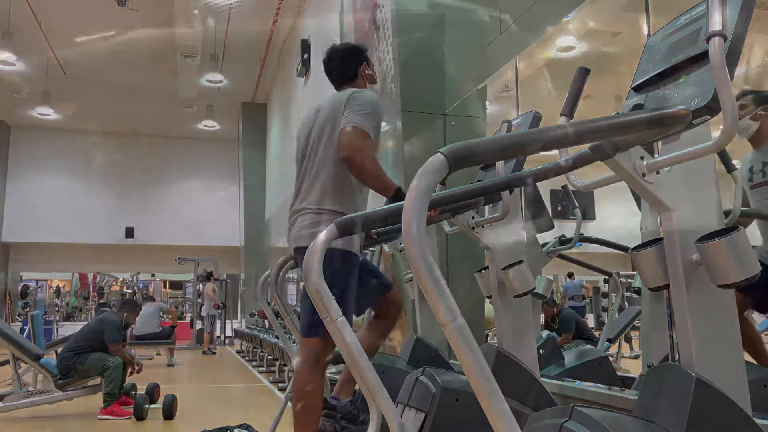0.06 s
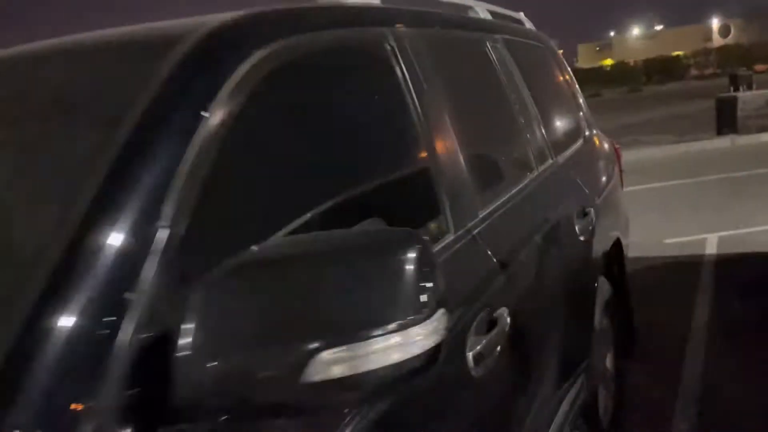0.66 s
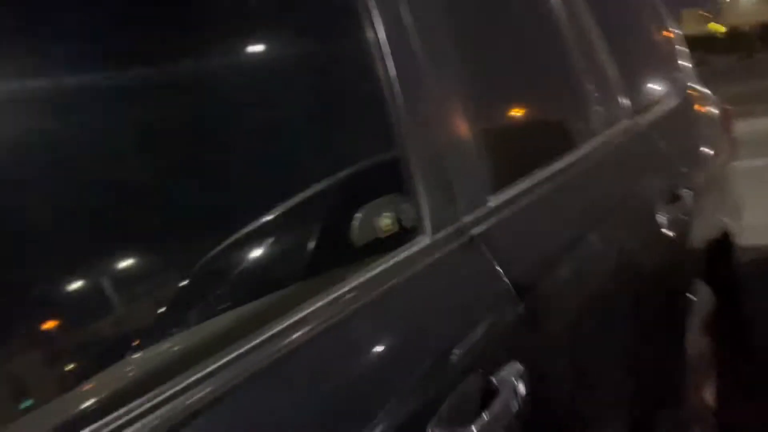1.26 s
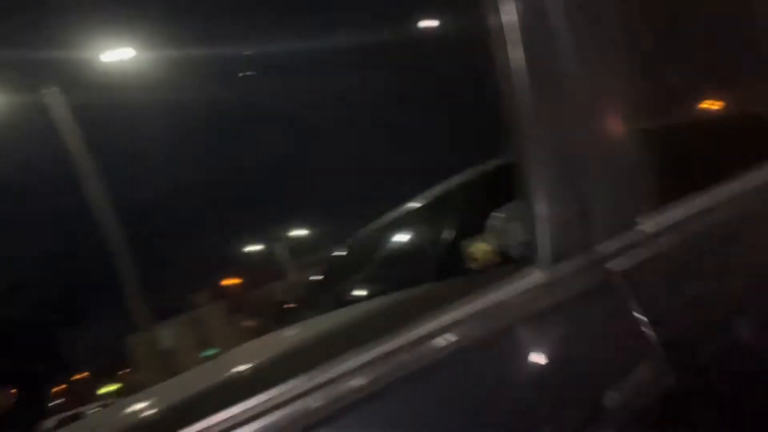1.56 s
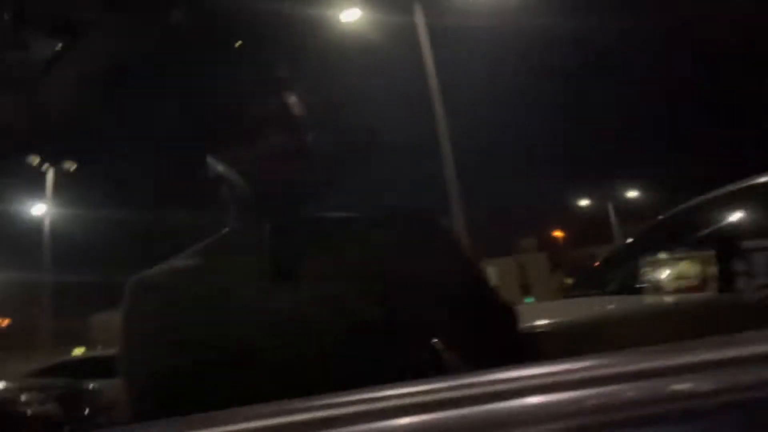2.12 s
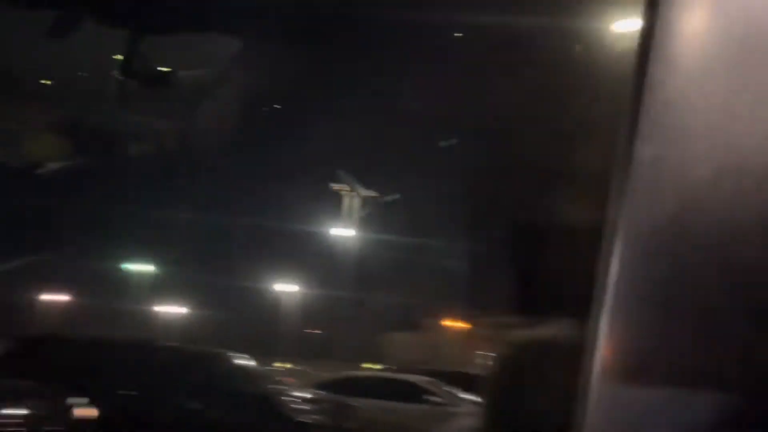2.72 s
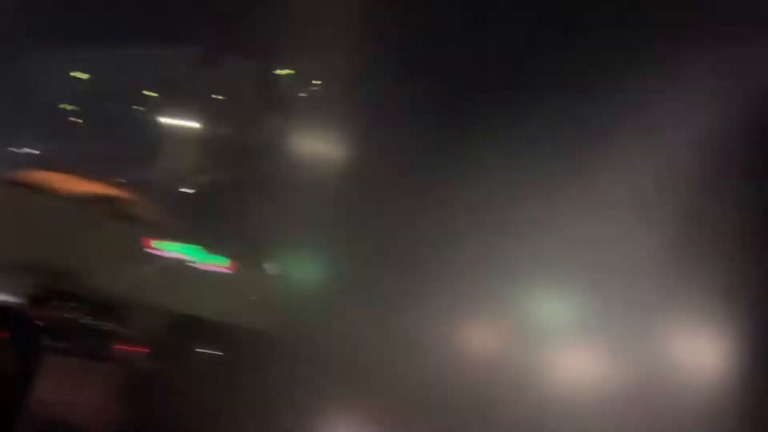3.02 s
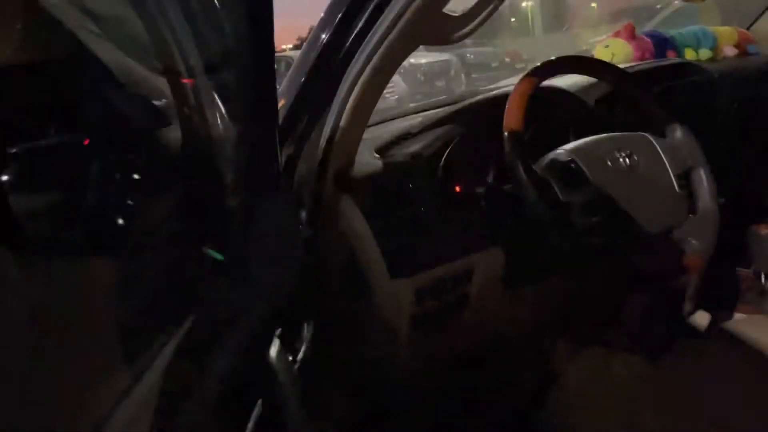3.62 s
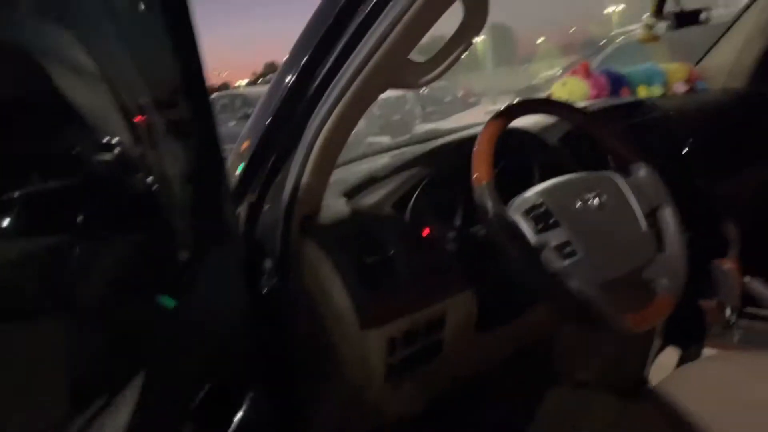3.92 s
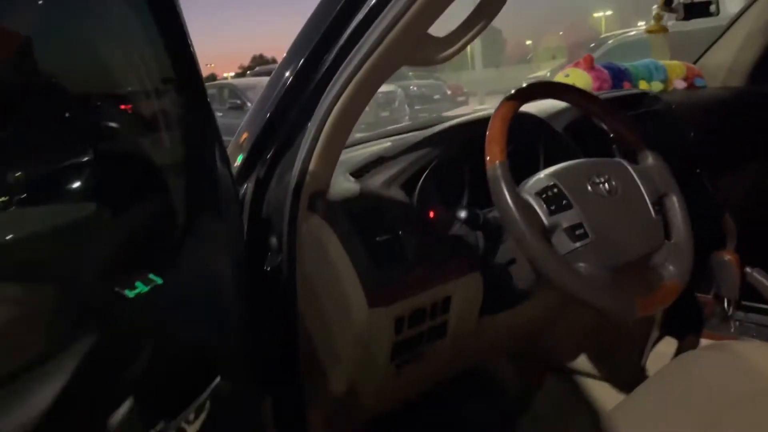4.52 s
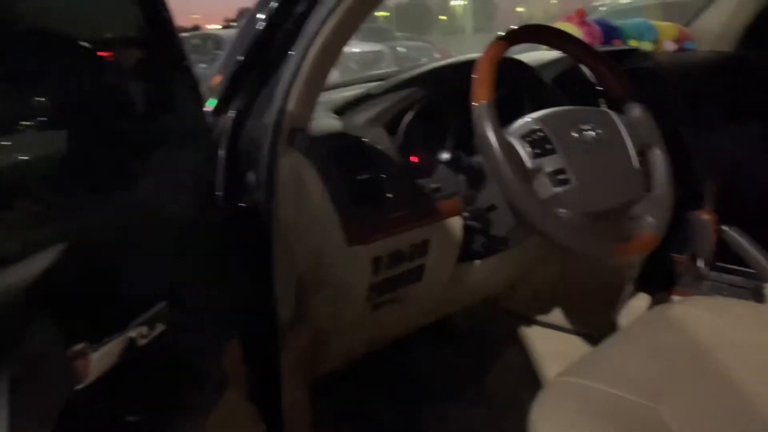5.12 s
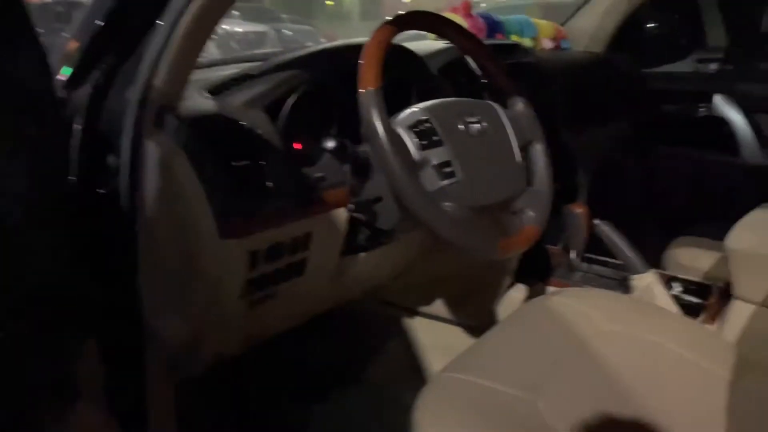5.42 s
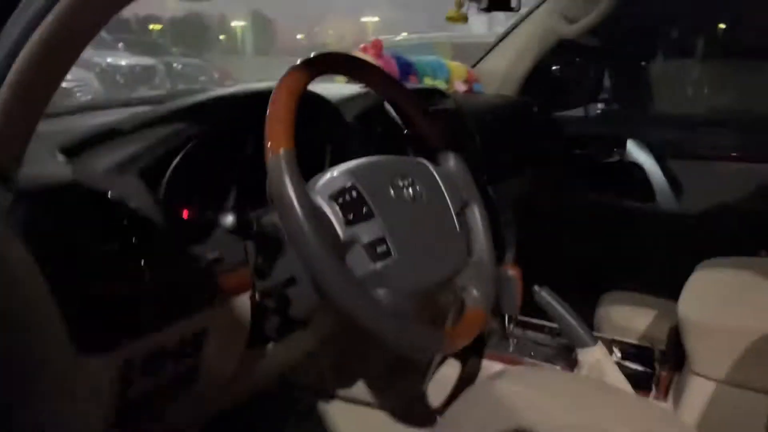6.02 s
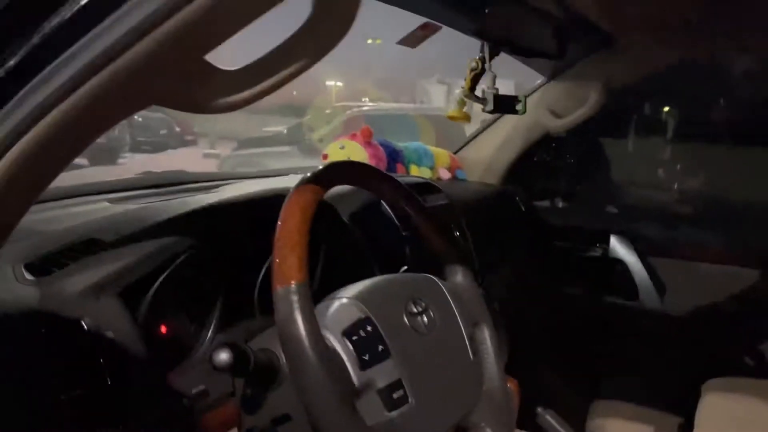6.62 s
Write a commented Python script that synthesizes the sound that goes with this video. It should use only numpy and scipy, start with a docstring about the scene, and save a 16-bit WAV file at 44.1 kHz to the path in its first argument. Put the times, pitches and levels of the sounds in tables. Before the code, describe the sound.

A gym's drone of exercise machines, with a faint pulsing squeal, fades out by 0.7 seconds. A low engine rumble and distant traffic in an outdoor car park continue throughout. From 0.8 seconds light steps tick on grit, and a hiss gradually swells while a hand rubs faintly by the microphone. At 2.5 seconds a car door handle scrapes out with a dull thud, very close. At about 3.1 seconds comes the loudest sound: the steel latch snaps and the seal pops with a deep thump, cutting off the swelling hiss. The handle immediately knocks back, and the door bumps softly at 3.3. Clothes rustle faintly from 3.5 to 3.8, and a small motor gives a tiny whirr at 4.2. At 6.2 seconds a short scuff on the sill ends in a click. The cabin softens the traffic, with a last faint rustle near 6.8.

```python
"""The drone of a hall with running exercise machines fades into a night car park: engine rumble, far traffic.
Steps tick on grit and a hiss swells as someone walks up to a car; a hand rubs by the microphone.
The door handle scrapes out with a thud, the steel latch snaps, the seal pops, the handle knocks back
and the door bumps its stay. Clothes rustle, a small motor whirrs and a scuff on the sill ends in a click,
while the cabin shelters the microphone more and more."""
import sys
import numpy as np
from scipy import signal
from scipy.fft import rfft, irfft, next_fast_len
from scipy.io import wavfile

SR = 44100
rng = np.random.default_rng(int(sys.argv[2]) if len(sys.argv) > 2 else 0)


def generate_wav(signal):
    """Clip the signal to [-1, 1] and save it as 16-bit WAV at the path in sys.argv[1]."""
    frames = np.transpose(np.atleast_2d(signal))
    scaled = np.clip(frames, -1, 1) * 32767
    pcm = np.round(scaled).astype(np.int16)
    wavfile.write(sys.argv[1], SR, pcm)


N = 302516
TIME = np.arange(N) / SR


def from_db(db):
    """Decibels to gain."""
    return 10 ** (np.asarray(db) / 20)


def unit_rms(x):
    """Scale to unit power."""
    return x / np.sqrt(np.mean(x ** 2) + 1e-20)


def automation(rows):
    """A curve of (seconds, value) points, read at every sample."""
    return np.interp(TIME, *np.transpose(rows))


def at_hz(points, hz):
    """Read a table along log frequency, held at its ends."""
    f, value = np.transpose(points)
    return np.interp(np.log(hz + 1), np.log(f), value)


def response(spectrum, hz, skirt_db=30):
    """Unit-power EQ curve that falls by skirt_db an octave for two octaves beyond its ends."""
    octaves_out = np.abs(np.log2((hz + 1) / np.clip(hz + 1, spectrum[0][0], spectrum[-1][0])))
    return unit_rms(from_db(at_hz(spectrum, hz) - skirt_db * np.minimum(octaves_out, 2)))


def colour(x, spectrum, tilt_db=0):
    """Minimum-phase EQ with this spectrum, tilted by tilt_db an octave."""
    size = 2 * next_fast_len(x.shape[-1] // 2 + 1)
    hz = np.fft.rfftfreq(size, 1 / SR)
    gain = unit_rms(response(spectrum, hz) * from_db(tilt_db * np.log2(hz + 100)))
    cepstrum = irfft(np.log(gain))[:size // 2]
    cepstrum[1:] *= 2
    return irfft(rfft(x, size) * np.exp(rfft(cepstrum, size)))[..., :x.shape[-1]]


def low_cut(x, edge_hz, order=2):
    """Roll off the bass, as a small body radiates little below its edge."""
    return signal.sosfilt(signal.butter(order, edge_hz, "high", fs=SR, output="sos"), x)


# Stereo image of diffuse noise. Each row: frequency in Hz, left-right correlation from -1 to 1.
CORRELATION = [(120, 0.97), (270, 0.66), (600, 0.062), (2000, 0), (6000, 0.38), (8500, 1)]
def diffuse_noise(spectrum):
    """Unit-power stereo noise, wide in the mids and narrow in the bass and the top."""
    size = 2 * next_fast_len(N // 2 + 1)
    hz = np.fft.rfftfreq(size, 1 / SR)
    alike = np.clip(at_hz(CORRELATION, hz), -.99, .99)
    mid, side = rfft(rng.standard_normal((2, size)))
    stereo = np.sqrt(1 + alike) * mid + np.sqrt(1 - alike) * side * [[1], [-1]]
    return unit_rms(irfft(stereo * response(spectrum, hz))[:, :N])


def drift(rate):
    """Random modulation of unit power, with rate new values a second."""
    knots = rng.standard_normal(16384)
    return unit_rms(np.interp(TIME * rate, np.arange(len(knots)), knots))


def tones(lines, wander_hz, flutter_db, flutter_rate):
    """Sines that waver in pitch and level."""
    out = np.zeros(N)
    for hz, db in lines:
        gain = from_db(db + flutter_db * drift(flutter_rate)) * np.sqrt(2)
        pitch = hz + wander_hz * drift(8)
        out += gain * np.sin(2 * np.pi * np.cumsum(pitch) / SR)
    return out


def swell(peak_s, rise_s, decay_s):
    """Envelope of a stroke: a rounded rise, then an exponential decay."""
    before, after = np.maximum(peak_s - TIME, 0), np.maximum(TIME - peak_s, 0)
    return np.exp(-(before / rise_s) ** 3 - after / decay_s)


def plateau(centre_s, half_s):
    """A flat-topped envelope with soft edges."""
    return np.exp(-((TIME - centre_s) / half_s) ** 4)


def struck(s, modes, lag_cycles=0, soft_hz=SR):
    """Modes ring from time s; low bending waves can lag, and a soft contact spares the high ones."""
    out, span = np.zeros(N), slice(int(s * SR), int(s * SR) + SR // 2)
    for hz, db, t60 in modes:
        age = np.maximum(TIME[span] - s - lag_cycles / hz, 0)
        envelope = from_db(db - 60 * age / t60) / np.hypot(1, hz / soft_hz)
        out[span] += envelope * np.sin(2 * np.pi * hz * age)
    return out


def burst(decay_s, spectrum, width, tilt_db=0, crack=0):
    """A contact: an optional crack, then a fast-dying cluster of tiny impacts."""
    fade = np.exp(-TIME[:SR // 8] / decay_s)
    mid, side = rng.standard_normal((2, len(fade)))
    impacts = (mid + width * side * [[1], [-1]]) * fade
    impacts[:, 0] += crack * np.linalg.norm(fade)
    return unit_rms(colour(impacts, spectrum, tilt_db)) * np.sqrt(np.mean(fade ** 2))


def friction(stroke, spectrum, grain_db, width):
    """Noise that catches and slips under the stroke."""
    mid, side = rng.standard_normal((2, N)) * stroke * from_db(grain_db * drift(640))
    return colour(mid + width * side * [[1], [-1]], spectrum)


def pan(x, left_db, left_lag_s):
    """Place a near source: the left side is louder by left_db and slightly delayed."""
    left = np.interp(TIME - left_lag_s, TIME, x)
    return np.array([left, x]) * from_db([[left_db / 2], [-left_db / 2]])


def add(out, s, sound):
    """Mix a short sound in at time s."""
    start = round(s * SR)
    out[:, start:start + sound.shape[1]] += sound


# The hall's drone and its machine hums. Each row: frequency in Hz, relative level in dB.
HALL_EQ = [(100, -24), (215, -1.5), (360, -11), (550, -6.5), (870, -8), (1180, -21.5), (2300, -27),
           (3200, -33), (8600, -47)]
MACHINE_HUMS = [(110, -2.5), (1650, -29)]
def hall(level_db=-28, fade_s=0.73, squeal_hz=2355, squeal_db=-49.5, turns_per_s=12.7):
    """Running machines drone and hum, one squealing with each turn; all fade to nothing."""
    fade = np.maximum(1 - TIME / fade_s, 0) ** 1.59
    hums = sum(tones(MACHINE_HUMS, wander_hz=14, flutter_db=4, flutter_rate=45) for _ in range(2))
    squeal = np.array([tones([(squeal_hz, squeal_db)], wander_hz=11, flutter_db=2.5, flutter_rate=110)
                       for side in range(2)])
    pulse_db = 4.5 * np.cos(2 * np.pi * turns_per_s * (TIME - 0.022))
    drone = from_db(level_db) * (diffuse_noise(HALL_EQ) + 0.33 * hums)
    return fade * (drone + np.sqrt(fade) * from_db(pulse_db) * squeal)


# The three outdoor beds and the engine's hum. Each row: frequency in Hz, relative level in dB.
RUMBLE_EQ = [(30, -3), (48, -1.5), (70, -1.5), (100, -0.5), (145, -6), (190, -10), (280, -16.5), (350, -21)]
TRAFFIC_EQ = [(260, -3.5), (370, -3), (500, 0.5), (900, -6), (1300, -10), (2200, -15.5), (2750, -21.5),
              (3200, -24), (4400, -27)]
HISS_EQ = [(2400, 4), (2780, 8), (3200, 3), (4200, -0.5), (5500, 1), (7000, -2.5), (8300, 3.5),
           (11500, 8.5), (12500, -44)]
ENGINE_HUM = [(64.5, -4.5), (97.5, -7), (148, -13), (278, -23.5)]
# The rumble's fader, highest beside the car. Each row: time in seconds, level in dB.
RUMBLE_FADER = [(0, -40), (1.1, -38.5), (2.5, -36), (3.3, -37.5), (4.8, -39.5), (6.86, -40.5)]
# The way into the cabin. Each row: time in seconds, amount of shelter from 0 to 1.
SHELTER = [(3.05, 0.44), (3.3, 0.41), (5.5, 0.59), (6.1, 0.8)]
# Brief dips. Each row: centre and half length in seconds, cuts to rumble, traffic and hiss in dB.
BED_DIPS = [(3.215, 0.041, 5.5, 5, 5), (4.568, 0.082, 8.5, 2, 0.5)]
def car_park(traffic_db=-47.5, hiss_db=-59.5, traffic_shelter_db=5, hiss_shelter_db=9.5):
    """An engine rumbles and hums under far traffic and fine hiss, both of which the cabin softens."""
    shelter = automation(SHELTER)
    dips = sum(np.outer(cuts, plateau(s, half)) for s, half, *cuts in BED_DIPS)
    rumble_dip, traffic_dip, hiss_dip = dips
    engine = diffuse_noise(RUMBLE_EQ) + tones(ENGINE_HUM, wander_hz=3.5, flutter_db=3, flutter_rate=14)
    rumble = from_db(automation(RUMBLE_FADER) - rumble_dip) * engine
    traffic_gain = from_db(traffic_db - traffic_shelter_db * shelter - traffic_dip + 1.24 * drift(25))
    traffic = traffic_gain * diffuse_noise(TRAFFIC_EQ)
    hiss_gain = from_db(hiss_db - hiss_shelter_db * shelter - hiss_dip + 0.75 * drift(7.9))
    return rumble + traffic + hiss_gain * diffuse_noise(HISS_EQ)


def rush(release_s=3.0548, hiss_db=-49.5, body_db=-41.5, rise_db_per_s=10.5, stop_s=0.0088):
    """A hiss grows on the way to the door, gains body late and stops as the latch lets go."""
    growth_db = rise_db_per_s * np.minimum(TIME - release_s, 0)
    gate = np.exp(-np.maximum(TIME - release_s, 0) / stop_s)
    hiss = from_db(hiss_db + growth_db + drift(23.2)) * diffuse_noise(HISS_EQ)
    body = from_db(body_db + 1.12 * growth_db) * diffuse_noise(TRAFFIC_EQ) * from_db([[1], [-2]])
    return gate * (hiss + body)


# The tone of a gritty contact. Each row: frequency in Hz, relative level in dB.
GRIT_EQ = [(300, 3), (1000, 8), (3000, -6.5), (5000, -15.5), (9000, -16), (12500, -24)]
# Steps on grit, ticks of trim and of the handle's linkage.
# Each row: start in seconds, level in dB, decay in seconds, resonance in Hz.
TICK_CUES = [(0.7963, -39, 0.0095, 2360), (0.866, -45, 0.011, 1150), (1.2672, -38, 0.012, 1040),
             (1.335, -42, .005, 1690), (1.9163, -36, .0036, 1050), (2.2522, -34, 0.0031, 1470),
             (2.4066, -41.5, 0.01, 1480), (2.4300, -31, 0.011, 935), (2.445, -32, 0.002, 8100),
             (2.56, -24.5, 0.004, 2180), (2.6299, -34.5, 0.011, 1940), (2.6840, -30, 0.0015, 1350),
             (3.1434, -20.5, 0.0012, 4900), (4.48, -45, 0.022, 1440), (6.6242, -40, 0.0049, 3270),
             (6.671, -47, .005, 2770)]
def ticks():
    """Light gritty contacts, each with one broad resonance and little body below it."""
    out = np.zeros((2, N))
    for s, db, decay, hz in TICK_CUES:
        grit = burst(decay, GRIT_EQ, width=0.6, crack=.5)
        resonance = burst(decay, [(hz / 1.4, -9), (hz, 0), (hz * 1.35, -8)], width=0.51)
        add(out, s, from_db(db) * low_cut(0.75 * grit + 0.58 * resonance, edge_hz=hz / 2))
    return out


# The fader of the rubbing hand. Each row: time in seconds, level in dB.
GRIP_FADER = [(1.5, -63.5), (2.7, -55.5), (3.04, -52), (3.2, -62.5), (3.55, -54.5), (4.1, -61),
              (4.7, -65.5)]
# The casing's resonances. Each row: frequency in Hz, relative level in dB.
CASING_EQ = [(400, 4.5), (740, -5), (920, 7.5), (1100, -15), (2500, -14), (2830, -4.5), (3150, -20),
             (7000, -21.5)]
def handling(slip_rate=90, slip_db=-4.5, slip_spread_db=10):
    """A hand rubs faintly on the hollow casing by the microphone; the skin slips in tiny crackles."""
    rub = from_db(2.5 * drift(11) + 1.8 * drift(130)) * diffuse_noise(CASING_EQ)
    slip_gain = from_db(slip_spread_db * np.minimum(drift(slip_rate), 2))
    slips = unit_rms(slip_gain * diffuse_noise(GRIT_EQ))
    return from_db(automation(GRIP_FADER)) * (rub + from_db(slip_db) * slips)


# The latch's crack and its steel modes. Each row: frequency in Hz, relative level in dB.
SNAP_EQ = [(200, -25), (550, 5), (850, -6), (1200, -7), (1600, 1), (2150, -2), (2700, -5.5), (3500, -9.5),
           (5500, -13.5), (8700, -12.5), (11700, -15), (12800, -26)]
STEEL_MODES = [(1530, -0.5), (1900, -3), (2420, -6), (2750, -3.5), (3133, -11), (3480, -13), (4215, -14),
               (6630, -13), (8930, -7.5)]
# Metal snaps of handle and lock, in a quick run as the latch lets go.
# Each row: start in seconds, level in dB, decay in seconds, brightness in dB per octave.
SNAP_CUES = [(2.2520, -32.5, 0.0019, 1.5), (2.5458, -33, 0.002, 2), (3.0553, -1, 0.00027, -3),
             (3.057, -5.5, 0.00083, 8), (3.0609, -0.5, 0.00018, 1), (3.0628, -5.5, 0.00038, -4.5),
             (3.068, -29, 0.0008, 2), (3.1299, -18.5, 0.0021, 4)]
def latch(ring_db=21, ring_loss_per_tilt=0.62, t60_s=.013):
    """Each snap cracks and sets the steel ringing in a fresh balance; the mids lean left."""
    out = np.zeros((2, N))
    for s, db, decay, tilt_db in SNAP_CUES:
        add(out, s, from_db(db) * burst(decay, SNAP_EQ, width=0.1, tilt_db=tilt_db, crack=1.3))
        modes = [(hz, level + rng.normal(0, 1.5), t60_s) for hz, level in STEEL_MODES]
        # the ring follows the snap's energy, less after a thin bright one
        ring_gain = from_db(db + ring_db - ring_loss_per_tilt * tilt_db) * np.sqrt(decay)
        out += ring_gain * struck(s, modes)
    mids = signal.sosfilt(signal.butter(1, [900, 5500], "band", fs=SR, output="sos"), out)
    return out + 0.41 * mids * [[1], [-1]]


# The scrape of the handle. Each row: frequency in Hz, relative level in dB.
PULL_EQ = [(200, -18), (720, 14.5), (1200, -1), (1900, 0), (3700, -9), (5500, -16), (8700, -10.5),
           (12500, -20)]
# Its strokes. Each row: peak time in seconds, level in dB, rise and decay in seconds.
PULL_CUES = [(2.517, -26.5, 0.0059, 0.018), (2.571, -36.5, 0.0091, 0.011)]
def handle_pull():
    """The handle slides out with friction in two short pulls."""
    stroke = sum(from_db(db) * swell(s, rise, decay) for s, db, rise, decay in PULL_CUES)
    return friction(stroke, PULL_EQ, grain_db=2.5, width=0.44)


# The door panel's modes. Each row: frequency in Hz, level in dB, time to fall 60 dB in seconds.
PANEL_MODES = [(66.2, 3.5, 0.062), (155, 2, 0.041), (237, 3.5, 0.034), (295, 2, 0.039), (464, -5, 0.074),
               (652, -9, 0.045), (844, -17, 0.028)]
# Blows on it. Each row: start in seconds, level in dB, cut-off in Hz (lower is softer).
THUD_CUES = [(2.5103, -18.5, 900), (2.5144, -9.5, 700), (2.548, -13.5, 140), (2.563, -15.5, 120),
             (3.073, -29, 600)]
def panel_thuds():
    """Handle and latch shake the door panel, whose low bending waves arrive last."""
    return sum(from_db(db) * struck(s, PANEL_MODES, lag_cycles=0.4, soft_hz=hz)
               for s, db, hz in THUD_CUES)


def seal_pop(start_s=3.0555, level_db=-4.5, start_hz=300, end_hz=66, fall_s=.0087,
             attack_s=.0015, hold_s=.010, decay_s=.010):
    """The compressed seal lets the door jump free: a boom that falls in pitch as the tension goes."""
    age = np.maximum(TIME - start_s, 0)
    hz = (end_hz + (start_hz - end_hz) * np.exp(-(age / fall_s) ** 2)) * (age > 0)
    envelope = np.minimum(age / attack_s, 1) * np.exp(-np.maximum(age - hold_s, 0) / decay_s)
    return from_db(level_db) * envelope * np.sin(2 * np.pi * np.cumsum(hz) / SR)


# The handle's modes. Each row: frequency in Hz, level in dB, time to fall 60 dB in seconds.
HANDLE_MODES = [(554, -15, 0.062), (599, -1, 0.024), (900, -29, 0.056), (2470, -23, 0.045)]
# Its knocks. Each row: start in seconds, level in dB.
KNOCK_CUES = [(3.0566, -10), (3.1305, 0.5), (3.1323, -7)]
def handle_knocks():
    """The small hollow handle is jolted by the latch, then springs back, with no bass."""
    knocks = sum(from_db(db) * struck(s, HANDLE_MODES) for s, db in KNOCK_CUES)
    return pan(low_cut(knocks, edge_hz=350), left_db=3, left_lag_s=0.00023)


def stay_bump(peak_s=3.269, level_db=-22.5, hz=102):
    """The swinging door meets its stay with a soft low bump."""
    envelope = from_db(level_db) * swell(peak_s, rise_s=0.009, decay_s=0.0092)
    return envelope * np.cos(2 * np.pi * hz * (TIME - peak_s))


# The tone of fabric. Each row: frequency in Hz, relative level in dB.
CLOTH_EQ = [(400, 16.5), (1200, 9), (3000, 1.5), (6000, -4), (9000, -3), (12500, -16)]
# Its rustles. Each row: centre in seconds, level in dB, half length in seconds.
RUSTLE_CUES = [(3.502, -58.5, 0.064), (3.61, -54, 0.021), (3.81, -54, 0.026), (6.795, -55.5, 0.14)]
def clothes():
    """Fabric rubs in soft, grainy swells."""
    envelope = sum(from_db(db) * plateau(s, half) for s, db, half in RUSTLE_CUES)
    return envelope * from_db(2 * drift(200)) * diffuse_noise(CLOTH_EQ)


# The motor's gear noise and its tones. Each row: frequency in Hz, relative level in dB.
GEAR_EQ = [(900, 4), (3000, -2), (7200, -12), (8300, -4), (12000, -15)]
MOTOR_TONES = [(1195, -9), (3031, -13), (4377, -18)]
def motor_whirr(full_s=4.243, hold_s=0.045, level_db=-49):
    """A small motor runs for a moment: near-steady tones in gear noise fade in, hold and fade out."""
    attack = swell(full_s, rise_s=0.011, decay_s=np.inf)
    release = swell(full_s + hold_s, rise_s=np.inf, decay_s=0.013)
    motor = diffuse_noise(GEAR_EQ) + tones(MOTOR_TONES, wander_hz=4.96, flutter_db=1, flutter_rate=80)
    return from_db(level_db) * np.minimum(attack, release) * motor


# The tone of the scuff. Each row: frequency in Hz, relative level in dB.
SCUFF_EQ = [(650, -17), (1050, 0.5), (1450, 2), (2050, 2), (2380, 0), (3000, -7.5), (6300, -16),
            (7300, -21), (12500, -26)]
# The sill's modes. Each row: frequency in Hz, level in dB, time to fall 60 dB in seconds.
SILL_MODES = [(667, -6.5, 0.074), (926, -3, 0.034), (1440, 5.5, 0.022), (1780, -8, 0.05),
              (2370, -2.5, 0.054), (6330, -12, .02)]
def sill_scuff(peak_s=6.197, rub_db=-32, click_s=6.1958, click_db=-24):
    """A grainy slide over the sill ends in a ringing click."""
    stroke = from_db(rub_db) * swell(peak_s, rise_s=0.03, decay_s=0.0097)
    rub = friction(stroke, SCUFF_EQ, grain_db=-1, width=0.64) * from_db([[1.2], [-1.2]])
    click = low_cut(from_db(click_db) * struck(click_s, SILL_MODES), edge_hz=680)
    return rub + pan(click, left_db=5, left_lag_s=.00004)


def reflections(x, t60_s=0.14, dull_hz=3500, predelay_s=.004):
    """A short diffuse tail from the car body and the ground."""
    age = TIME[:SR // 2]
    tail = rng.standard_normal((2, len(age))) * from_db(-60 * age / t60_s) * (age > predelay_s)
    tail = signal.sosfilt(signal.butter(1, dull_hz, fs=SR, output="sos"), tail)
    return signal.fftconvolve(x, tail / np.sqrt(np.sum(tail ** 2) / 2), axes=1)[:, :N]


def scene():
    """Close contacts with their reflections and the quiet details, over the car park and the hall."""
    door = handle_pull() + panel_thuds() + latch() + seal_pop() + handle_knocks() + stay_bump()
    close = door + sill_scuff() + ticks()
    tail = from_db(-36.5) * reflections(close)
    details = clothes() + handling() + motor_whirr()
    return close + tail + details + car_park() + rush() + hall()


def mic_ports(x, hz=10090, width_hz=2030, boost_db=1.5):
    """Both microphone ports resonate in the high treble, where the two sides fall out of phase."""
    resonance = signal.iirpeak(hz, hz / width_hz, fs=SR)
    left, right = x + (from_db(boost_db) - 1) * signal.lfilter(*resonance, x)
    return np.array([left - 2 * signal.lfilter(*resonance, left), right])


def record(dry, ceiling=.73, top_hz=12400):
    """The ports colour the treble, the sub-bass is cut, peaks are rounded off and the top is cut."""
    trimmed = low_cut(mic_ports(dry), edge_hz=35, order=4)
    limited = trimmed / (1 + (trimmed / ceiling) ** 6) ** (1 / 6)
    return signal.sosfilt(signal.ellip(10, .3, 100, top_hz, fs=SR, output="sos"), limited)


dry = scene()
out = record(dry)
generate_wav(out)
```